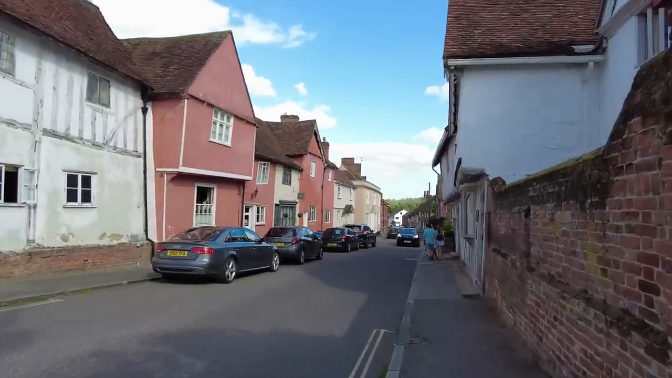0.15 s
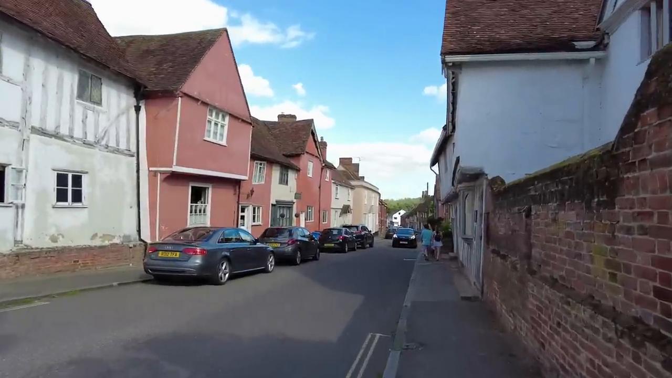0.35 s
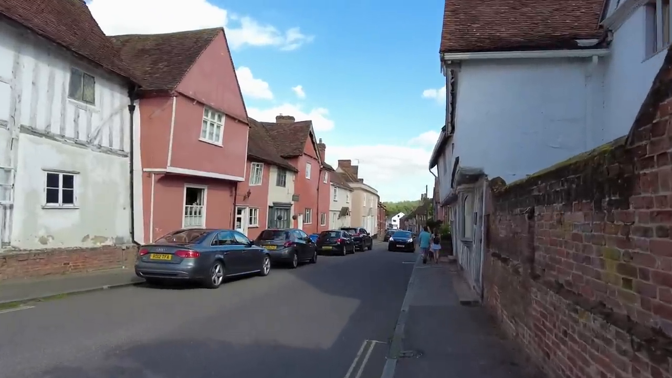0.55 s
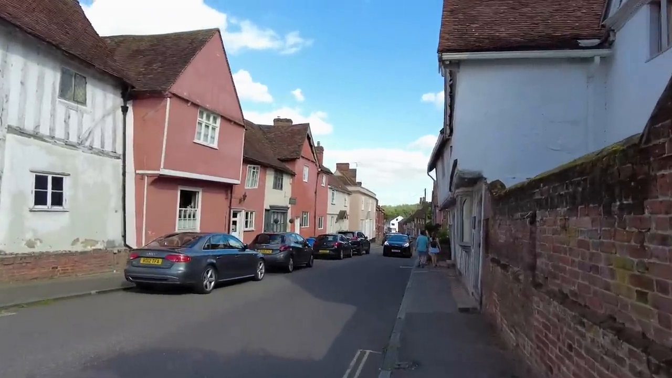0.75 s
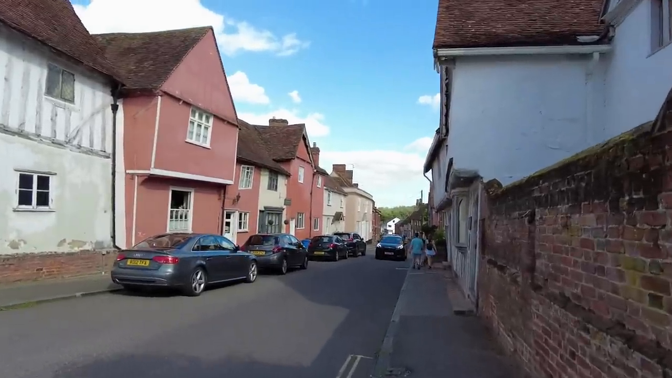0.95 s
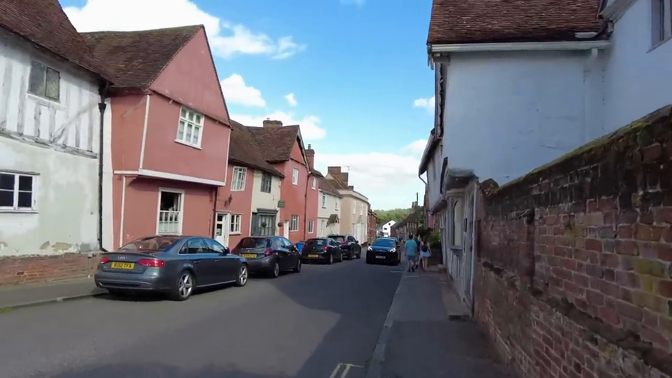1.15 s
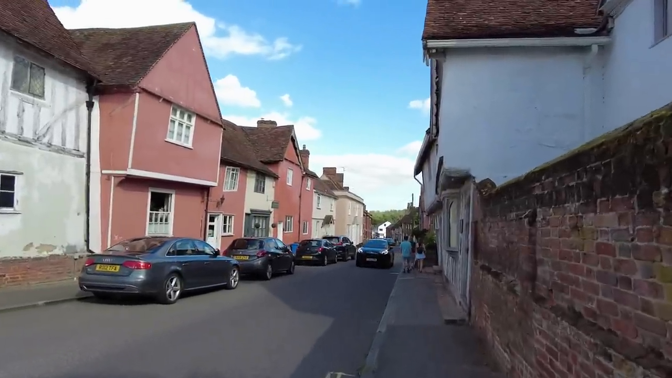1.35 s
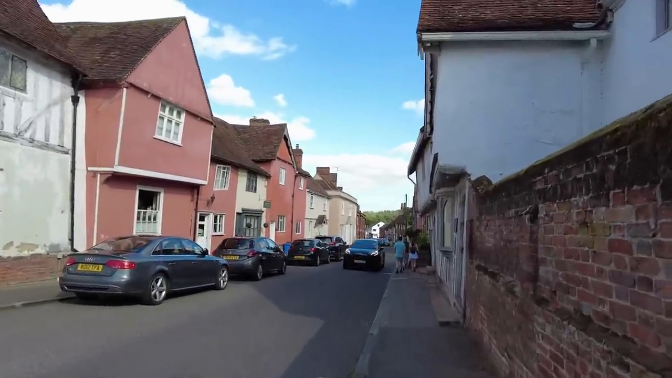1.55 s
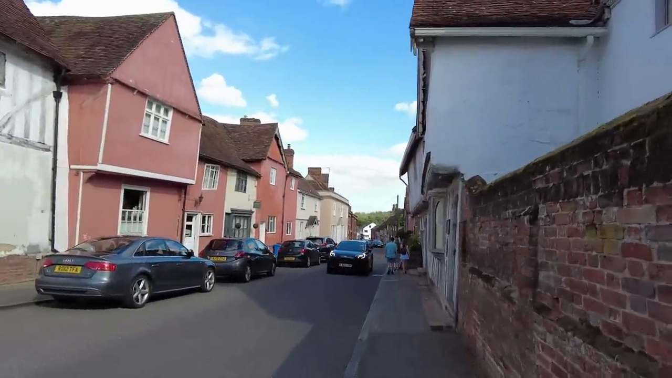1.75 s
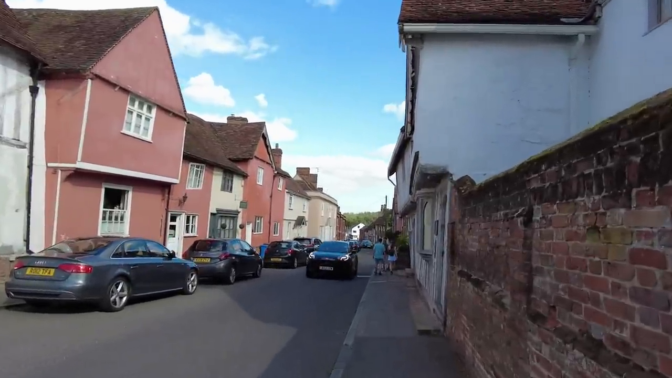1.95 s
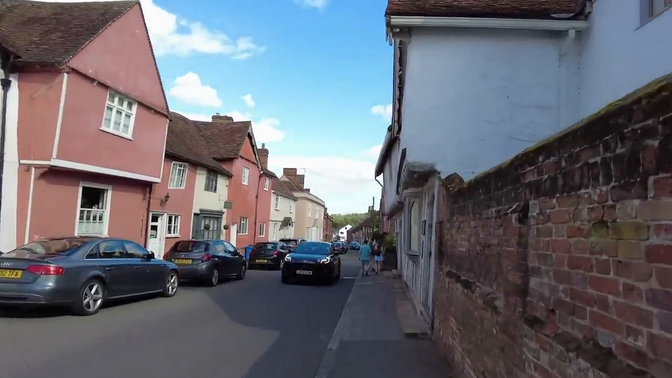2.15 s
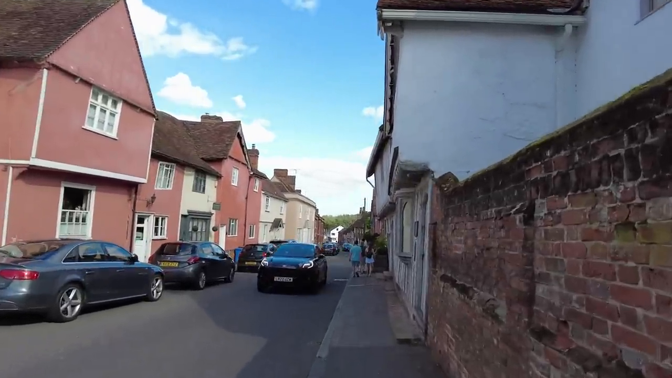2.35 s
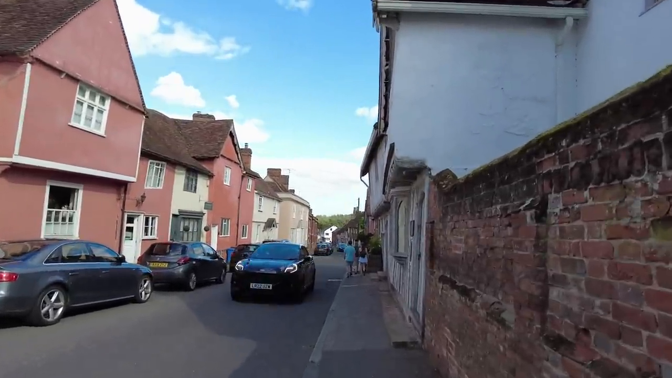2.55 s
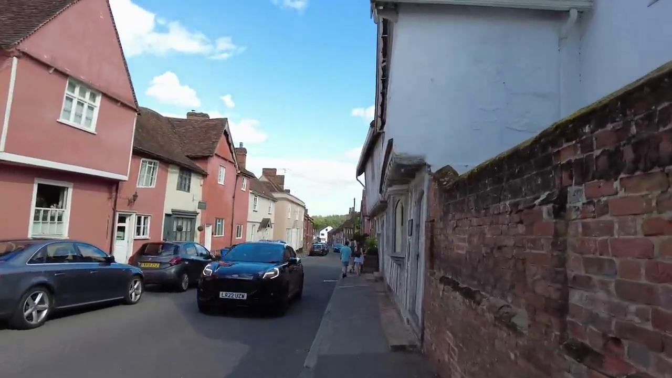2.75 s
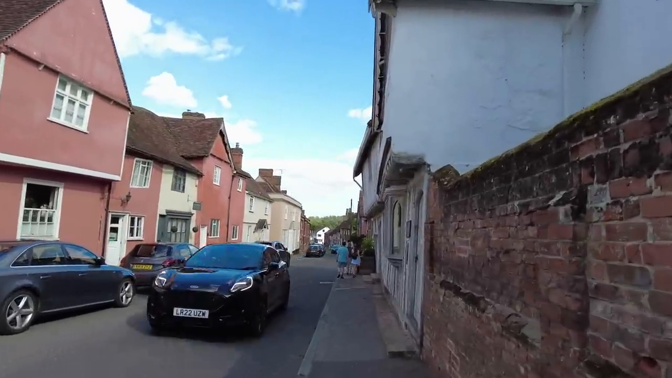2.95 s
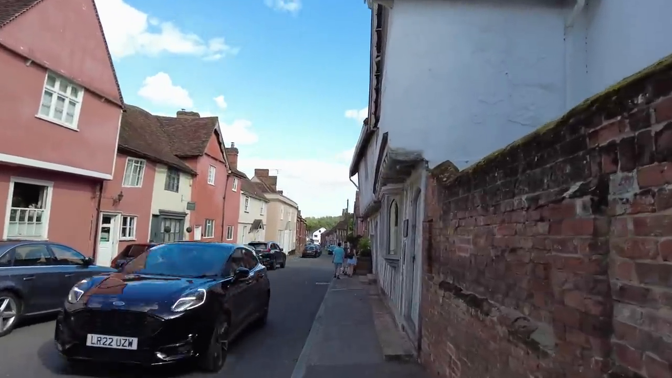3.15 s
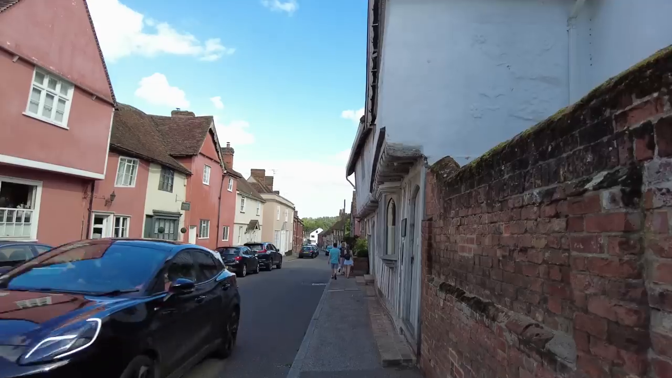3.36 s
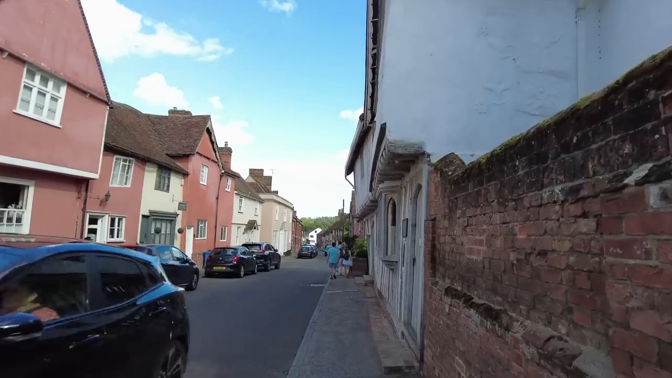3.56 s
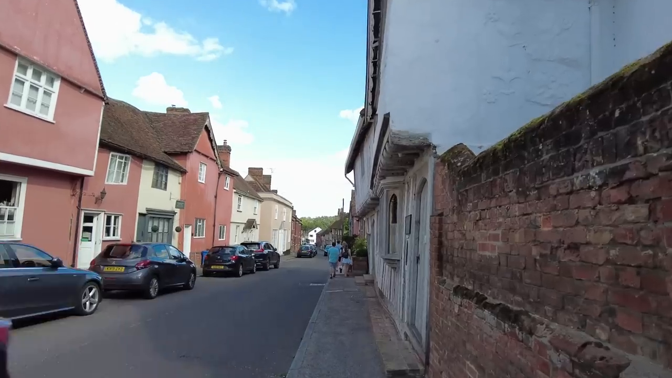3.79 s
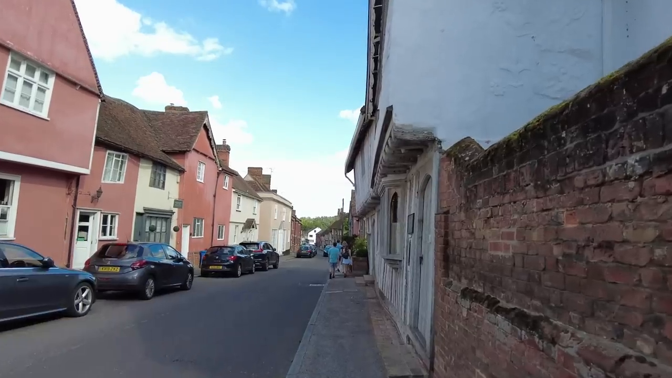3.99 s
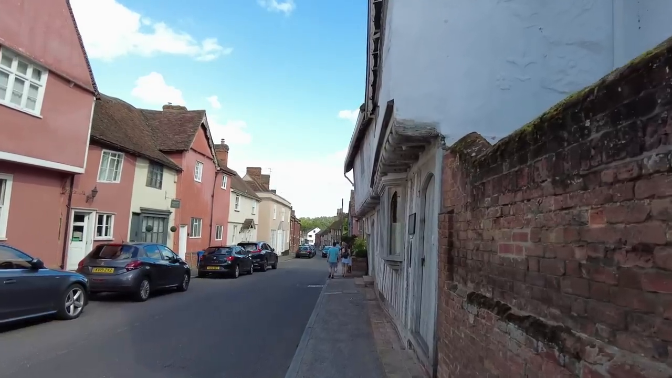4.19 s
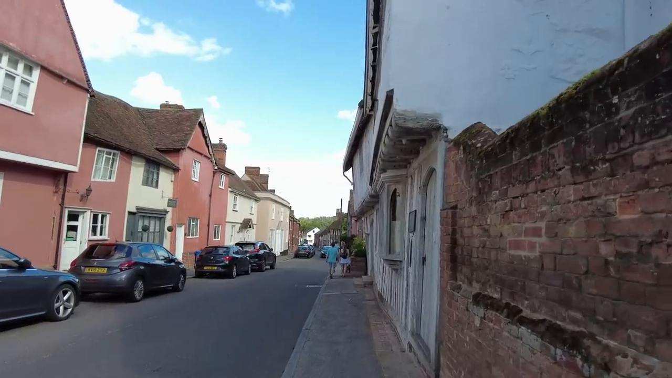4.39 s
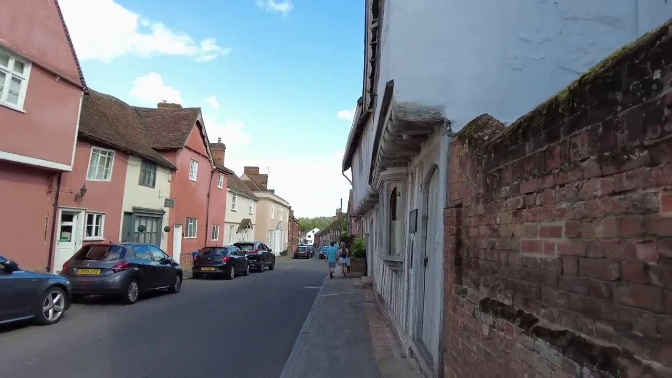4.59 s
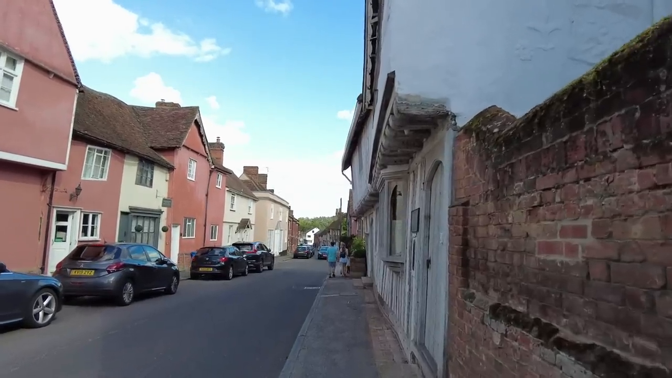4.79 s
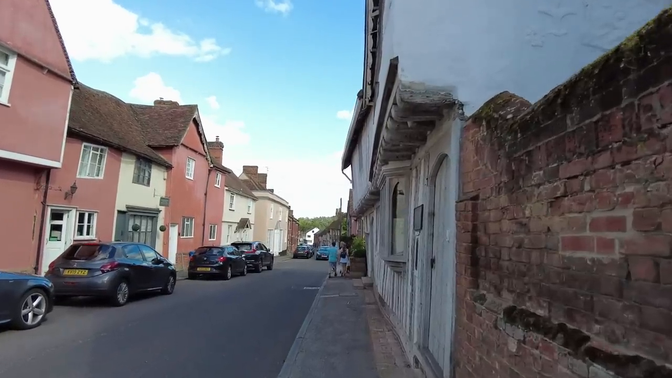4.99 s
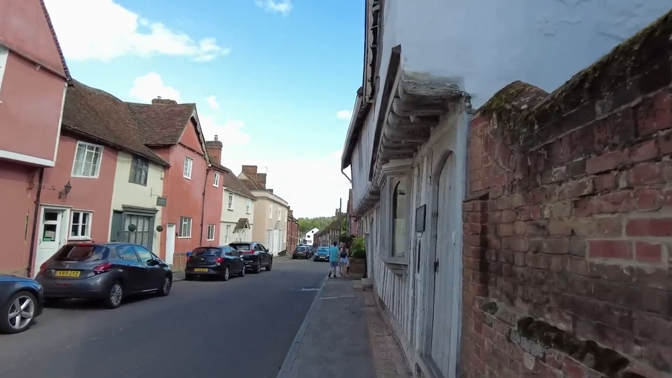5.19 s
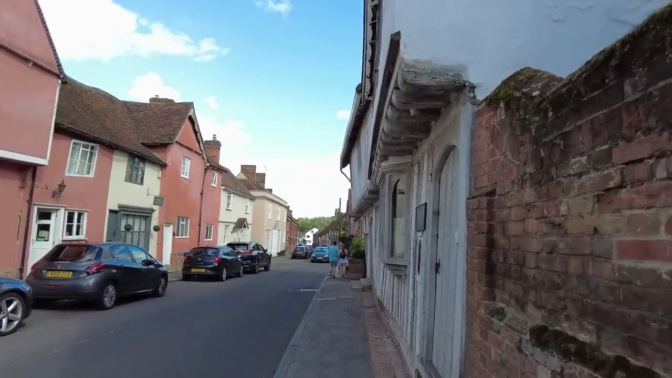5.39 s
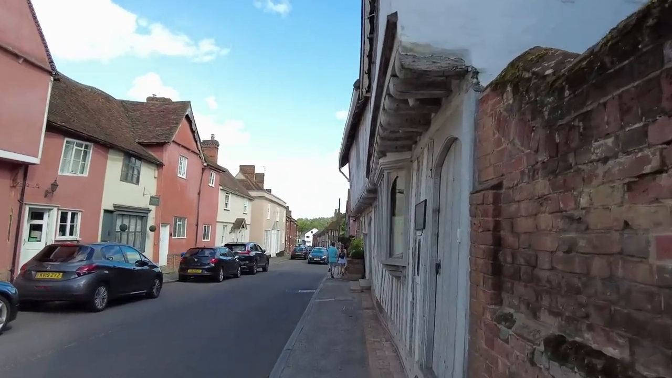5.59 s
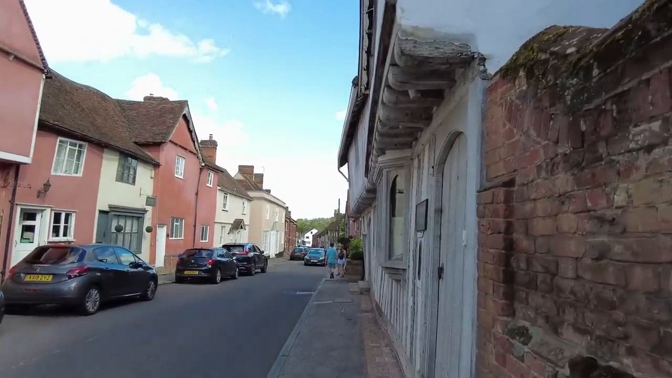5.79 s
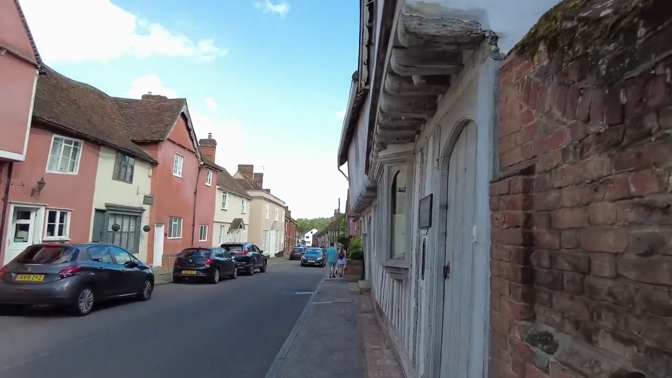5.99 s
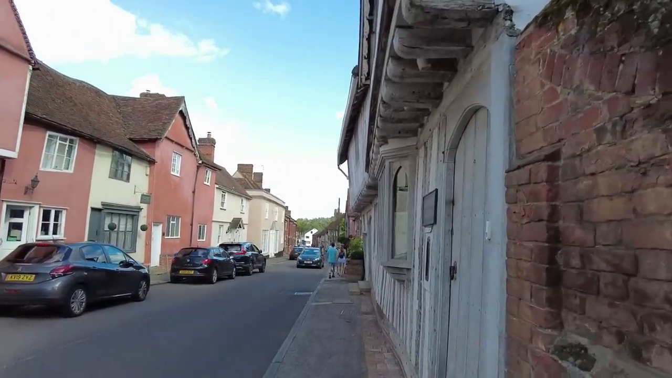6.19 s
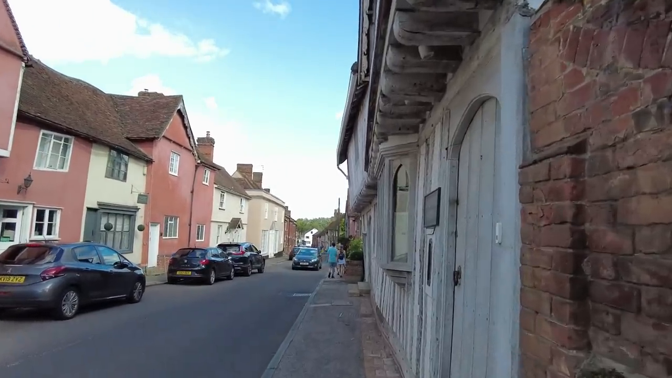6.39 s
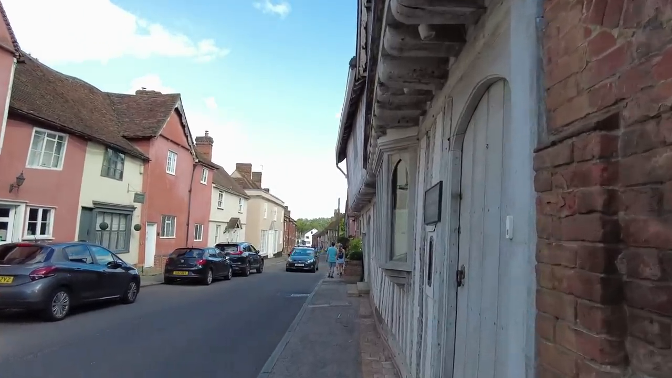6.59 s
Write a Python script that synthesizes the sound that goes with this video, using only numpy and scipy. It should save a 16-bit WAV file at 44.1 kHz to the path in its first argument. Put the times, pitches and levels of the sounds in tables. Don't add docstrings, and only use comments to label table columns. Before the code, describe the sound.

A small car approaches along a narrow village street, passes close with tyre roar and deep exhaust rumble, then recedes as soles crunch faint grit.

```python
import sys
import numpy as np
from scipy import signal
from scipy.io import wavfile
from scipy.ndimage import uniform_filter1d

SR = 44100
rng = np.random.default_rng(int(sys.argv[2]) if len(sys.argv) > 2 else 0)


def field_ratio(decibels):
    return 10 ** (np.asarray(decibels, dtype=float) / 20)


def store_wav(level_fs):
    pcm = np.round(np.clip(np.atleast_2d(level_fs), -1, 1) * 32767)
    wavfile.write(sys.argv[1], SR, pcm.T.astype(np.int16))


N = 292824
T = np.arange(N) / SR

PASS_S, SPEED_M_S, LANE_M = 3.533, 9.3, 2.6
AXLE_S, PIPE_S, TURN_S = 0.43, 0.76, 0.21
NEXT_PASS_S, NEXT_DB = 7.97, -1.5


def evened(x):
    return x / np.sqrt(np.mean(x ** 2) + 1e-20)


def read(points, hz):
    f, value = np.transpose(points)
    return np.interp(np.log(hz + 1), np.log(f + 1), value)


def columns(table):
    s, *values = np.transpose(table)
    return [np.interp(T, s, v) for v in values]


def add(mix, s, sound):
    part = mix[round(s * SR):][:len(sound)]
    part += sound[:len(part)]


def drift(size):
    smooth = uniform_filter1d(rng.standard_normal(N), size=size)
    return evened(uniform_filter1d(smooth, size=size))


def noise(spectrum, patchy_db, wide=12):
    hz = np.fft.rfftfreq(2048, 1 / SR)
    a, b, patches = rng.standard_normal((N // 512 + 5, 1025, 3)).T
    patches = uniform_filter1d(patches, size=wide, axis=0)
    patches = evened(uniform_filter1d(patches, size=6, axis=1))
    inside = (hz >= spectrum[0][0]) & (hz <= spectrum[-1][0])
    level = field_ratio(read(spectrum, hz)[:, None] + patchy_db * patches)
    z = (a + 1j * b) * level * inside[:, None]
    return evened(signal.istft(z, nperseg=2048, noverlap=1536)[1][:N])


def resonate(x, hz, width_hz):
    turn = np.exp(2j * np.pi * np.cumsum(hz * np.ones(len(x))) / SR)
    r = np.exp(-np.pi * width_hz / SR)
    once = signal.lfilter([1 - r], [1, -r], x / turn)
    twice = signal.lfilter([1 - r], [1, -r], once)
    return 2 * (turn * twice).real


def away(after_s):
    return np.sqrt(1 + (SPEED_M_S * (T - PASS_S - after_s) / LANE_M) ** 2)


def behind(after_s, turn_s):
    return .5 + .5 * np.tanh((T - PASS_S - after_s) / turn_s)


def heard(spread_db, parts_s, next_db=NEXT_DB, shade=1.):
    first = sum(field_ratio(-spread_db * np.log10(away(s))) ** 2 for s in parts_s) * shade ** 2
    second = field_ratio(next_db - spread_db * np.log10(away(NEXT_PASS_S - PASS_S))) ** 2
    return np.sqrt(first + second)


# (time [s], level [dB])
FIRST_ORDER = [(0, -49), (.72, -43.5), (1.2, -50), (1.33, -45), (1.66, -37.5), (1.9, -36), (2.57, -34),
               (2.85, -31.5), (3.1, -35.5), (3.53, -21.5), (3.85, -18.5), (4.59, -22), (4.99, -26),
               (5.18, -35), (5.46, -31.5), (5.82, -43.5), (6.3, -34.5), (6.5, -59)]
# (level abreast [dB], loss per tenfold distance [dB], time of a swell [s], lag behind nose [s])
HIGHER_ORDERS = [
    (-41, 10.5, 3.55, 0.68),
    (-43.5, 12, 3.48, -0.21),
]


def exhaust():
    firing_hz = 37.42 + 0.22 * drift(size=6000)
    phase = 2 * np.pi * np.cumsum(firing_hz) / SR
    orders_db = columns(FIRST_ORDER)
    for db, spread_db, swell_at_s, after_s in HIGHER_ORDERS:
        swell_db = 1.5 * np.cos(2 * np.pi * (T - swell_at_s) / 0.852)
        orders_db.append(db - spread_db * np.log10(away(after_s)) + swell_db)
    return sum(np.sqrt(2) * field_ratio(db) * np.cos((k + 1) * phase) for k, db in enumerate(orders_db))


# (time [s], jolt of tyres [dB], jolt of body [dB])
ROAD_BUMPS = [(.76, 1, -2), (1.19, 0, 0), (1.36, 6, -1), (1.49, 1.5, 1.5), (1.64, 9, -4), (1.98, 0, 8),
              (2.12, 4, 5), (2.47, 3.5, -3), (2.58, -3, 11), (2.92, 0.5, 2.5), (3.08, -1.5, -4),
              (3.25, 1.5, 0), (3.73, 5, 3), (3.88, 3.5, 4), (4.101, 7.5, -14), (4.86, -0.5, 8.5),
              (5.33, -1, 1.5), (5.5, 0.5, 4), (5.69, 4, 3.5), (5.97, 5, -1), (6.19, 4.5, 2), (6.31, 3, 5)]


def jolts():
    width_s = 0.048
    return sum(np.array(jolt)[:, None] * np.exp(-.5 * ((T - s) / width_s) ** 2) for s, *jolt in ROAD_BUMPS)


# (time [s], resonance [Hz], ring above roar [dB])
TREAD = [(0, 915, -2.5), (.8, 907, -6.5), (1.6, 960, -1.5), (1.97, 770, 2.5), (2.12, 855, -2.5),
         (2.27, 843, 1), (2.55, 898, 0), (2.95, 866, -5), (3.45, 941, -5.5), (3.72, 796, -6),
         (4.3, 970, -3), (4.65, 970, -8.5), (5.4, 890, -2), (5.97, 940, -8.5), (6.3, 906, -3.5),
         (6.64, 850, -18)]
# (frequency [Hz], density [dB per Hz])
FAR_SPECTRUM = [(160, -39), (280, -2), (303, -4.5), (564, -4.5), (638, -6), (963, -4.5), (1150, -4),
                (1330, -7.5), (2050, -20.5), (4000, -37.5), (5200, -52.5), (8800, -120)]
# (frequency [Hz], density [dB per Hz])
NEAR_SPECTRUM = [(160, -36), (280, 0), (331, -28.5), (378, -1.5), (552, -4.5), (852, 0), (1260, -8.5),
                 (2070, -16.5), (2770, -26.5), (4000, -33), (5200, -62), (8800, -120)]


def tyres(tyre_jolt_db, body_jolt_db):
    axles = [0, AXLE_S]
    gone = behind(AXLE_S + TURN_S, TURN_S)
    bright_m, bright_behind = 8.9, 0.35
    near = 1.075 * (1 - (1 - bright_behind) * gone)
    near = near / (1 + (away(AXLE_S / 2) * LANE_M / bright_m) ** 2)
    near = np.clip(near, 0, 1)
    roar = np.sqrt(1 - near) * noise(FAR_SPECTRUM, patchy_db=2.0)
    roar += np.sqrt(near) * noise(NEAR_SPECTRUM, patchy_db=1.5)
    tread_hz, tread_db = columns(TREAD)
    tread = evened(resonate(rng.standard_normal(N), tread_hz, width_hz=222))
    roar_gain = field_ratio(-35 + 0.067 * body_jolt_db) * heard(17, axles, shade=field_ratio(-1.5 * gone))
    low = evened(resonate(rng.standard_normal(N), 225.0, width_hz=99.5))
    low_gain = field_ratio(-39 + tyre_jolt_db) * heard(15, axles, next_db=-0.5)
    return roar_gain * (roar + field_ratio(tread_db) * tread) + low_gain * low


# (frequency [Hz], density [dB per Hz])
BODY_SPECTRUM = [(15, -13), (25, 3), (45, 4), (55, -5), (65, 4), (100, 3), (170, -6), (300, -25.5),
                 (420, -47)]


def body_rumble(body_jolt_db):
    gain = field_ratio(-38.5 + body_jolt_db) * heard(6, [PIPE_S], next_db=-19.5)
    return gain * noise(BODY_SPECTRUM, patchy_db=1.3)


# (frequency [Hz], density [dB per Hz])
BAY_SPECTRUM = [(1060, -16), (1800, -7), (2080, -6), (2770, -4), (3700, -12.5), (4550, -11.5), (5170, -14),
                (7410, -20.5), (11800, -36), (13800, -39.5), (15500, -52)]
# (frequency [Hz], width [Hz], level [dB])
BLOCK_MODES = [
    (2820, 890, -6.5),
    (4470, 150, -16),
    (3790, 170, -19),
    (6300, 1700, -32.5),
]


def engine():
    shade = field_ratio(-8.5 * behind(0.57, 0.1))
    gain = field_ratio(-46.5 + 2.5) * heard(20, [0], -5.5, shade)
    far_depth, near_depth = 0.21, 0.52
    depth = np.clip(far_depth + (near_depth - far_depth) / away(0) ** 0.86, 0, 1)
    coming_hz, going_hz = 38.1, 36.65
    firing_hz = coming_hz + (going_hz - coming_hz) * behind(.05, .06)
    turns = np.cumsum(firing_hz) / SR + .2
    strength = field_ratio(2.0 * rng.standard_normal((400, 5)))[turns.astype(int)].T
    firing = np.exp(-(turns % 1) / 0.24)
    valve = 0.09 * np.exp(-((turns + .5) % 1) / 0.25)
    puffs = uniform_filter1d(firing + valve, size=90)
    hiss = (1 - depth + depth * 0.68 * strength[0] * puffs) * noise(BAY_SPECTRUM, patchy_db=1.5, wide=40)
    rings = np.zeros(N)
    for (hz, width_hz, db), blow in zip(BLOCK_MODES, strength[1:]):
        blows = rng.standard_normal(N) * blow ** 2 * puffs ** 2
        rings += field_ratio(db) * evened(resonate(blows, hz, width_hz))
    return gain * (hiss + 1.3 * depth * rings)


# (time [s], length [s], level [dB], pitch [Hz])
SOLE_SCUFFS = [(0, 0.078, -75, 6000), (0.368, 0.044, -70, 5600), (0.402, 0.05, -76, 6000),
               (0.51, 0.053, -73, 7000), (0.55, 0.027, -61, 2800), (0.598, 0.053, -70, 7500),
               (0.68, 0.011, -61, 5000), (1.092, 0.025, -60, 4580), (1.109, 0.026, -67, 7000),
               (1.135, .012, -68, 8500), (1.15, 0.021, -57.5, 3500), (1.676, 0.05, -64.5, 5330),
               (4.403, 0.022, -70.5, 6500), (4.438, 0.024, -74, 7540), (4.906, 0.018, -76, 9070),
               (4.966, 0.036, -70, 7500), (5.075, 0.025, -75, 7500), (5.58, 0.077, -71, 5980),
               (6.152, 0.07, -66.5, 5360), (6.254, 0.015, -70, 5010)]


def scuffs():
    out = np.zeros(N)
    crackle_db = 1.5 * np.repeat(rng.exponential(1, N // 40 + 1), 40)[:N]
    rasp = rng.standard_normal(N) * field_ratio(crackle_db)
    for s, length, db, hz in SOLE_SCUFFS:
        burst = rasp[round(s * SR):][:round(length * SR)]
        scrape = evened(resonate(burst, hz, width_hz=3700)) + field_ratio(-26) * evened(burst)
        add(out, s, field_ratio(db) * scrape * signal.windows.tukey(len(burst), .5))
    return out


# (time [s], peak level [dB], pitch [Hz])
GRAINS = [(0.0538, -54, 7000), (0.3778, -55, 5670), (0.3851, -55, 5800.0), (0.5459, -51, 5940),
          (0.5576, -59, 6000.0), (0.6041, -55, 7300.0), (0.6236, -49, 6900.0), (0.6816, -41.5, 5660),
          (1.092, -45.0, 5800.0), (1.0966, -42, 5370), (1.1014, -50, 4960), (1.109, -53, 7560),
          (1.1132, -49.0, 7400.0), (1.1555, -50, 5300.0), (1.261, -52, 7500.0), (1.339, -58.0, 8100),
          (1.5302, -52, 6760), (1.5719, -50, 6360), (1.6911, -53.0, 6300.0), (1.7001, -45, 5200.0),
          (4.5524, -53, 6400), (4.8276, -57, 5680), (4.912, -53, 7700.0), (4.9771, -57.0, 7900.0),
          (5.541, -47.5, 5500.0), (5.6357, -54, 7100.0), (5.7177, -58, 8850), (6.1773, -44, 5610),
          (6.1939, -44, 5990), (6.2484, -42, 5690)]


def grit():
    out, t = np.zeros(N), np.arange(200) / SR
    knock = field_ratio(-3.5) * np.exp(-t / 0.00071) * np.sin(2 * np.pi * 2300 * t)
    onset = 1 - np.exp(-t / .00008)
    for s, db, hz in GRAINS:
        crack = np.exp(-t / 0.0003) * np.sin(2 * np.pi * hz * t)
        add(out, s, field_ratio(db + 4.5) * onset * (crack + knock))
    return out


# (delay [s], level [dB])
REFLECTIONS = [
    (.0037, -18),
    (.0075, -16.5),
]


def with_wall_echoes(steps):
    wet = steps.copy()
    for delay, db in REFLECTIONS:
        add(wet, delay, field_ratio(db) * resonate(steps, 3700, width_hz=7200))
    return wet


# (frequency [Hz], density [dB per Hz])
STREET_SPECTRUM = [(880, -39.5), (1500, -1.5), (1640, 5.5), (2220, -12), (2720, -8), (3830, -38),
                   (7310, -25.5), (12300, -33), (15500, -40)]


def street():
    return field_ratio(-64.5) * noise(STREET_SPECTRUM, patchy_db=2.2, wide=40)


# (start [s], length [s], first pitch [Hz], last pitch [Hz], level [dB])
HUM_TONES = [(.3, .7, 31.4, 31.3, -48), (2, .55, 51.2, 50.6, -40), (2.65, 1.35, 50.2, 53.5, -36),
             (4, .45, 53.5, 53.8, -43), (.44, 1.1, 230.5, 227, -48), (1, .95, 285, 297, -55),
             (3.42, .2, 262, 256, -36), (3.2, .4, 290, 293, -44), (3.5, .4, 224, 228, -38.5),
             (3.9, .45, 221, 218.5, -38), (3.9, .5, 346, 326, -47), (4.3, 1, 325, 341, -51),
             (1.72, .6, 226, 226.5, -47), (3.1, .3, 254, 252, -43), (4.3, .35, 232, 228, -43),
             (3.75, .2, 155, 154, -40), (4.05, .2, 152, 151, -40), (2.4, .75, 178, 176, -47),
             (5.2, .7, 338, 338, -56), (5.3, .35, 213, 211, -45)]


def hums():
    out = np.zeros(N)
    for s, length, first_hz, last_hz, db in HUM_TONES:
        span = slice(round(s * SR), round((s + length) * SR))
        waver, swell = drift(size=1500)[span], drift(size=3000)[span]
        hz = np.linspace(first_hz, last_hz, len(waver)) + 2.2 * waver
        tone = np.sqrt(2) * np.cos(2 * np.pi * np.cumsum(hz) / SR)
        add(out, s, field_ratio(db + 1.45 * swell) * signal.windows.tukey(len(hz), .6) * tone)
    return out


def scene():
    tyre_jolt_db, body_jolt_db = jolts()
    car = exhaust() + tyres(tyre_jolt_db, body_jolt_db) + body_rumble(body_jolt_db) + engine() + hums()
    walker = with_wall_echoes(scuffs() + grit())
    return (car + walker + street())[None]


def treble_gate(x):
    hz, _, z = signal.stft(x, SR, nperseg=2048, noverlap=1024)
    power = abs(z) ** 2
    band = np.arange(1025) // 24
    band_power = np.add.reduceat(power, np.arange(0, 1025, 24), axis=0)
    band_db = 10 * np.log10(band_power + 1e-16)[band]
    loud_db = 10 * np.log10(power.sum(0) + 1e-16)
    whim_db = 2.6 * rng.standard_normal((43, z.shape[1]))[band]
    top = hz[:, None] > 12900
    usual_db = np.median(band_db, axis=1)[:, None]
    faint = top & (band_db < usual_db + 3.6 + 1.5 * whim_db)
    dimmed = (hz[:, None] > 6500) & (band_db < loud_db - 77.5 + 1.6 * whim_db)
    gain_db = np.where(faint, -13, np.where(top, 3.5, 0)) - 9 * dimmed
    return signal.istft(z * field_ratio(gain_db), SR, nperseg=2048, noverlap=1024)[1][:N]


def low_pass(x):
    return signal.sosfilt(signal.butter(12, 15660, fs=SR, output="sos"), x)


def record(dry):
    mix = treble_gate(dry[0])[None]
    return low_pass(mix)


dry = scene()
out = record(dry)
store_wav(out)
```